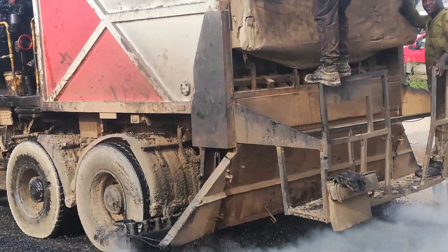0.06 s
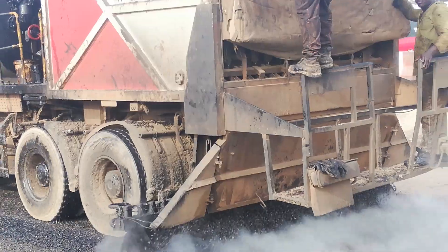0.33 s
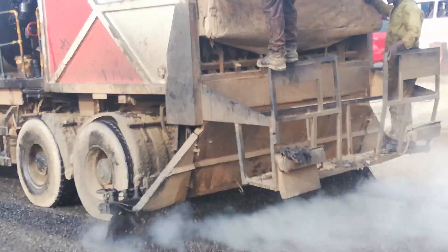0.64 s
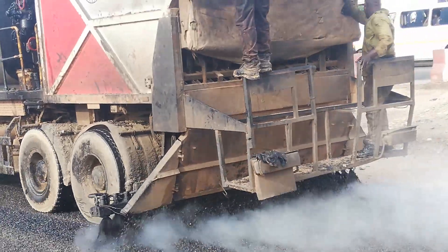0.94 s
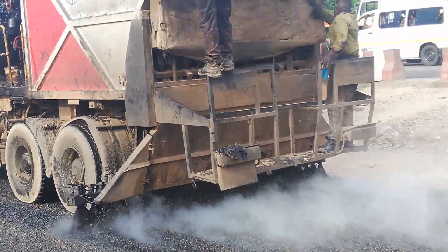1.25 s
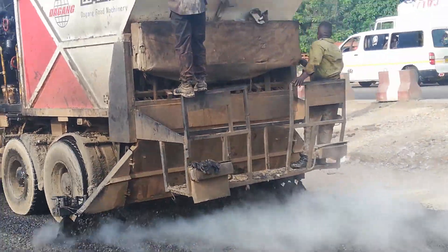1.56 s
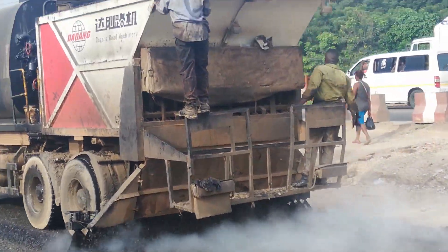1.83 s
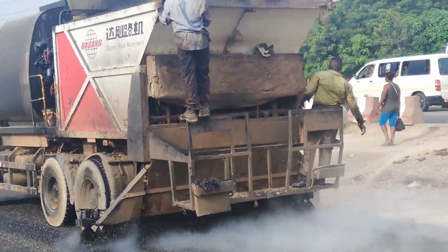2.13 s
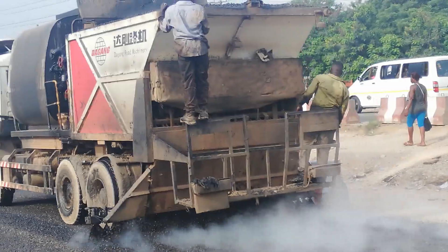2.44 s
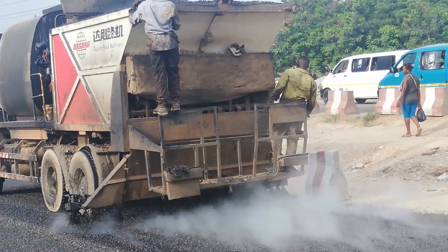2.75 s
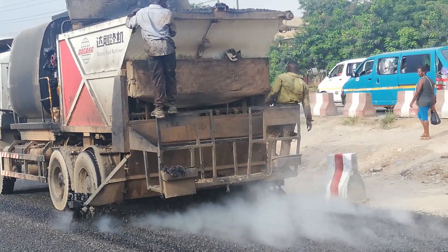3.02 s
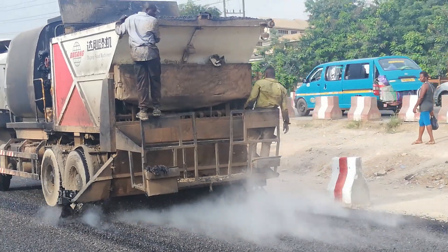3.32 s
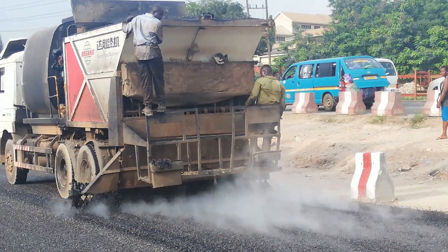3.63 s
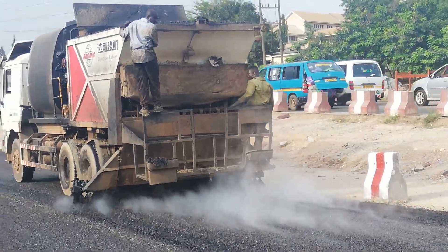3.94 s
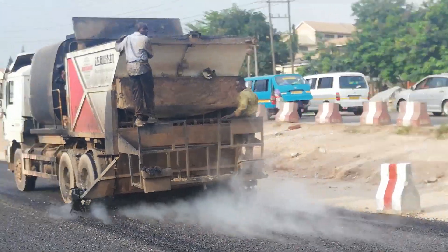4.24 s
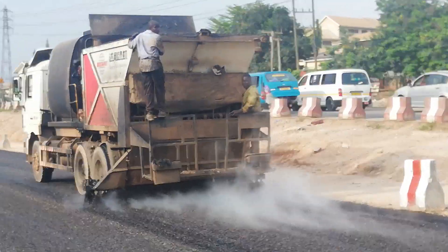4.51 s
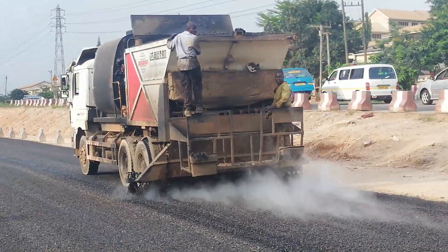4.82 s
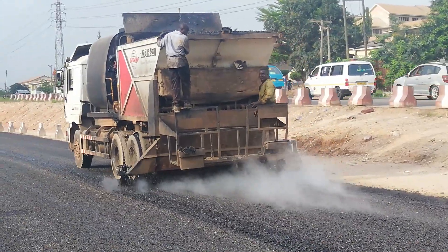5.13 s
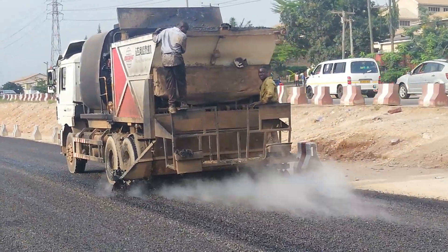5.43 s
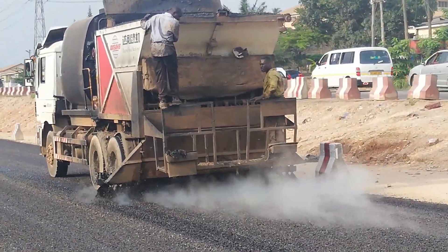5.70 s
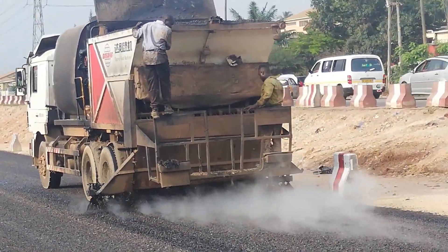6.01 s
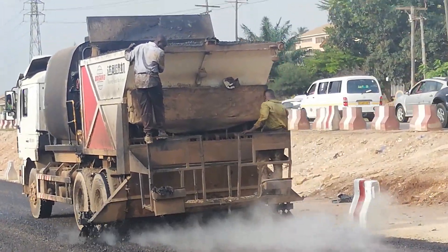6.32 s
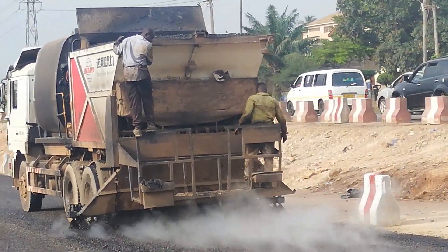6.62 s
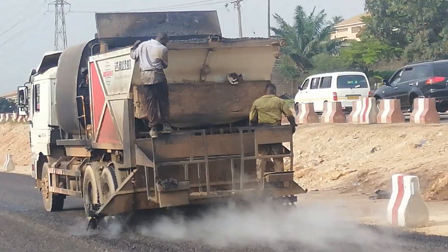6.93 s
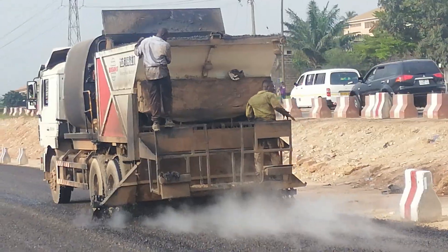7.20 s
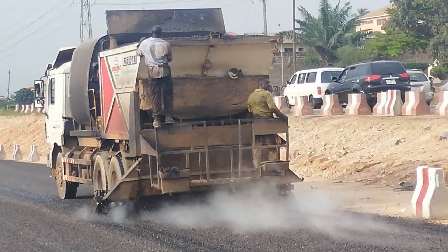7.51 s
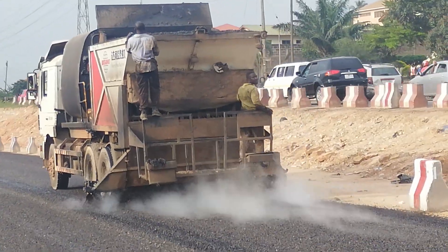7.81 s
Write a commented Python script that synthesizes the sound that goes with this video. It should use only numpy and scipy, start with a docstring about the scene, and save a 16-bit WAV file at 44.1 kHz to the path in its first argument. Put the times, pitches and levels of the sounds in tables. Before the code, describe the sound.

Gravel hisses continuously from a slow spreader truck as its diesel gathers speed, with light metal knocks and distant cars passing.

```python
"""Chip spreader on a fresh road

A truck crawls away, spraying bitumen and pouring chippings: random impacts sum to a hiss, and the spray
roars and rings its pipework. The diesel's harmonics rise with crank speed over a steady pump engine;
steel scrapes, squeaks and knocks, and cars pass beyond. A two-port microphone swings to follow the
truck, so its right port moves in and out of acoustic shadow."""
import sys
import numpy as np
from scipy import signal
from scipy.fft import rfft, irfft
from scipy.io import wavfile

SR = 44100
rng = np.random.default_rng(int(sys.argv[2]) if len(sys.argv) > 2 else 0)


def transcribe(u):
    """Save the signal u as a 16-bit wav file named by the first command-line argument.

    u: samples, shape (n,) or (channels, n), limited to [-1, 1]; the rate is SR.
    q: integer samples, one column per channel.
    """
    v = np.clip(np.atleast_2d(u).T, -1, 1)
    q = np.round(v * 32767).astype(np.int16)
    wavfile.write(sys.argv[1], SR, q)


N = 346626
TIME = np.arange(N) / SR
BINS = np.fft.rfftfreq(N, 1 / SR)

# Levels in spectra, modes and harmonics are relative; each source sets its own overall level.
# likeness of the two ports for far sound: f/Hz, coherence (0-1), right lag/rad
FAR_COHERENCE = [(30, 0.94, 0), (150, 1, 0), (280, 0.96, 0.5), (432, 0, 3.5), (660, 0.43, -2),
                 (940, 0.75, -1.66), (1170, 0.53, 0.5), (2040, 0.38, 1.46), (3040, 0.62, -0.3),
                 (4200, 0.13, 2.4)]
# spectrum of the chippings at the left port, which always faces them: f/Hz, level/dB
STONES_LEFT = [(1500, -19.5), (3600, -12.5), (4450, -14), (5100, -7.5), (6300, -5), (7400, -3.5),
               (8300, -2.5), (9200, 0), (9800, 1), (10500, 1.5), (11100, -4.5), (12000, -13.5),
               (13600, -17), (15600, -27)]
# the same at the right port, open, edge-on and shaded: f/Hz, level/dB, coherence (0-1), lag/rad
RIGHT_OPEN = [(1500, -47, 0.48, 8), (3520, -25, 0.1, 4), (4320, 2.5, 0.2, 0), (5230, -7.5, 0.5, 1.7),
              (6000, 7.5, 0.36, 4), (7150, -5, 0.75, -2), (7750, 6.5, 0.83, 4), (9850, -3, 0, 0),
              (11300, 6, 0.3, -5), (12100, -0.5, 0.33, 5.5), (13400, -8, 0.03, 2.6),
              (14400, -4, 0.09, -2.7), (15600, -17, 0.1, -0.0)]
RIGHT_EDGE_ON = [(1500, -19, 0.16, -11), (4270, -10, 0.05, 6), (4930, 0, 0.89, 1), (5840, -1, 0.83, 0.5),
                 (6500, 1, 0.42, -0.2), (7600, -4, 0.72, -1.8), (8140, -4, 0.12, 5), (8470, 2.5, 0.92, -6),
                 (9400, -1.5, 0.53, 1.1), (10300, 0.5, 0.26, 1.5), (12200, -5, 0.16, 4),
                 (13800, -6.5, 0.21, -0.1), (15600, -19, 0.1, -0.0)]
RIGHT_SHADED = [(1500, -25, 0.09, 2), (3600, -4.5, 0.51, 0), (4170, 0, 0.43, 0), (5000, -5.5, 0.36, 1.7),
                (6100, 1, 0.45, 4), (7200, -10, 0.22, 2), (8100, 1, 0.15, -2), (8600, -11, 0.29, -1.0),
                (9400, -5, 0.29, 5), (11600, -2, 0.33, -0.8), (13000, -8, 0.15, 2), (14000, -9, 0.08, 0.1),
                (15600, -18, 0.1, -0.0)]
# swing of the right port: t/s, bearing (0 open, 1 edge-on, 2 or more shaded), shadow gain/dB
PORT_SWING = [(0, 1.4, -9), (.33, 2.7, -13.5), (.6, 0.46, -5), (1.5, .09, -6), (3.2, .02, -7),
              (4.2, .42, -13), (4.8, 0.89, -9), (6.2, 1.07, -9), (6.8, 1.7, -12), (7.86, 2.3, -11)]
# surges and dips in the flow of stones: middle t/s, duration/s, change/dB
FLOW_SURGES = [(.42, 0.34, -1.3), (.78, 0.64, 1.0), (3.25, .26, -1.5), (5.23, 0.3, 0.8), (6.14, .2, -0.2)]
# roar of the spray bar and pumps: f/Hz, left level/dB, right level/dB
SPRAY_SPECTRUM = [(250, -13, -27), (470, -8.5, -13), (900, -7, -12), (1570, -11, -10), (2550, -4.5, -16.5),
                  (3100, -2.5, -12.5), (4020, -10, -6), (4680, -19, -21), (7000, -32, -37)]
# resonances of the pipework and the steel gate: f/Hz, width/Hz, left level/dB, right level/dB
PIPE_MODES = [(632, 70, -2.5, -6), (752, 100, -2, -7.5), (1104, 200, -4, -6.5), (1302, 170, -6, -2.5),
              (1953, 310, -4, -4.5), (2445, 130, -1, -22), (2610, 210, 2, -13)]
GATE_MODES = [(2510, 120, -9, -14), (2790, 190, -3, 1), (3190, 150, -9, -1), (3440, 200, -13, -4)]
# strokes of gravel through the gate: start t/s, duration/s, level/dB
GATE_STROKES = [(-.03, 0.093, -28), (.14, 0.062, -27)]
# squeaks of rollers and bearings: start t/s, end t/s, f/Hz, width/Hz, left level/dB
ROLLER_SQUEAKS = [(-.1, 0.25, 2090, 70, -38), (-.1, 0.23, 3160, 110, -35.5), (.1, 2.1, 3945, 45, -42.5),
                  (6.6, 7.6, 1602, 200, -46)]
# the diesel gathering speed: t/s, firing rate/Hz, exhaust level/dB
DIESEL_RUN = [(0, 66.4, -50), (.8, 67.5, -49), (1.5, 71.8, -39), (2.95, 80.9, -33.5), (3.45, 82.25, -36.5),
              (5.05, 83.56, -32), (5.8, 84.6, -27.5), (7.0, 86.4, -24.5), (7.86, 85.55, -25)]
# exhaust harmonics: order (multiple of crank speed), level/dB
ENGINE_ORDERS = [(1.5, -32), (2, -20), (2.5, -28), (3, 0.5), (3.5, -15), (4, -25), (4.5, -22), (5.5, -20),
                 (6, -16), (6.5, -22), (7, -17.5), (8, -23.5), (9, -23), (10.5, -22.5), (12, -26)]
# exhaust boom an octave above the firing rate: middle t/s, duration/s, change/dB
EXHAUST_BOOMS = [(7.48, 0.57, 9)]
# partials of the pump engine and its drive: f/Hz, level/dB
PUMP_PARTIALS = [(97, -0.5), (162, -9.5), (194.5, -12.5), (227, -10.5), (259, -9), (275, -10.5),
                 (324, -13.5)]
# spectra of the shaking chassis and the rolling wheels: f/Hz, level/dB
CHASSIS_SPECTRUM = [(20, -25), (45, -4), (65, -3), (100, -3.5), (125, -0.5), (160, -1), (210, -3),
                    (280, -7.5), (340, -10.5), (420, -19), (700, -38)]
WHEEL_SPECTRUM = [(8, -18), (28, -15), (48, 0), (68, 2), (110, -13)]
# lulls and jolts of the chassis: middle t/s, duration/s, change/dB
CHASSIS_JOLTS = [(.3, 1, -3.5), (.85, 0.8, 3), (6.65, .5, 2), (7.6, .7, 1.5)]
# tyre noise from the other carriageway: f/Hz, left level/dB, right level/dB
TYRE_SPECTRUM = [(248, 3, -29), (450, -1, -7), (730, 0.5, -6.5), (1060, 3, -4), (1500, -1.5, -7.5),
                 (2280, -6.5, -11), (3150, -3.5, -5), (3950, -44, -23), (7000, -34, -35)]
# passing cars: nearest t/s, time to half power/s, level/dB
CAR_PASSES = [(3.4, 1.0, -44.5), (5.1, 0.73, -32), (6.72, 0.33, -31), (7.85, 0.42, -32.5)]
# blows of the chute and stray stones: t/s, left level/dB, f/Hz, T60/s, relative rattle level/dB
CHUTE_KNOCKS = [(.419, -26.5, 590, 0.14, 0), (1.196, -31, 1500, .08, 9), (2.733, -26, 3020, .1, 2),
                (6.255, -31, 730, .12, 2)]
# passing engines, the deepest a van: start t/s, end t/s, first f/Hz, last f/Hz, level/dB
ENGINE_GLIDES = [(2.1, 3.6, 142, 159.7, -38), (3.0, 4.4, 29, 53.2, -35.5), (3.3, 3.85, 156, 134.7, -35)]


def amp(db):
    """Amplitude ratio for a level in decibels."""
    return 10 ** (np.asarray(db) / 20)


def unit_rms(x):
    """Normalisation to unit mean power."""
    return x / np.sqrt(np.mean(x ** 2) + 1e-20)


def curve(rows):
    """Linear interpolation of each column of a time table."""
    times, *columns = np.transpose(rows)
    return np.array([np.interp(TIME, times, column) for column in columns])


def swell(middle, length):
    """A raised-cosine window, from zero to one and back."""
    return np.cos(np.pi * np.clip((TIME - middle) / length, -.5, .5)) ** 2


def swells_db(rows):
    """Brief swells and dips, which add in decibels."""
    return sum(db * swell(middle, length) for middle, length, db in rows)


def fade_db(hold_s, db_per_s):
    """A hold, then exponential decay: a straight line in decibels."""
    return -db_per_s * np.maximum(TIME - hold_s, 0)


def drift(rate_hz):
    """Random wandering: low-pass Gaussian noise of unit rms."""
    white = rfft(rng.standard_normal(N))
    return unit_rms(irfft(white * np.exp(-(BINS / rate_hz) ** 2) * (BINS > 0), N))


def tone(hz):
    """A sinusoid of unit rms whose phase is the integral of its frequency."""
    return np.sqrt(2) * np.sin(2 * np.pi * (np.cumsum(hz) / SR + rng.random()))


def coloured(x, rows):
    """Spectral shaping by a level table, with steep roll-off beyond its ends; unit rms."""
    hz, *columns = np.transpose(rows)
    gain_db = np.array([np.interp(np.log(BINS + 1), np.log(hz + 1), column) for column in columns])
    passband = 1 / (1 + (hz[0] / (BINS + 1)) ** 6) / (1 + (BINS / hz[-1]) ** 24)
    return unit_rms(irfft(rfft(x) * amp(gain_db) * np.sqrt(passband), N))


def resonant(x, modes):
    """Modal superposition: x drives Lorentzian peaks, weighted for each port; unit rms."""
    response = sum(amp([[left], [right]]) / (1 + (2 * (BINS - hz) / width) ** 2)
                   for hz, width, left, right in modes)
    return unit_rms(irfft(rfft(x) * response, N))


def ring(x, hz, width_hz):
    """A single resonance, equal at both ports; unit rms."""
    return resonant(x, [(hz, width_hz, 0, 0)])


def ports(pair, coherence_rows):
    """Partial coherence: the right port mixes a phase-shifted left with an independent signal."""
    left, independent = rfft(pair)
    hz, coherence, lag = np.transpose(coherence_rows)
    shared = np.interp(BINS, hz, np.clip(coherence, 0, .999) * np.exp(-1j * lag))
    right = shared * left + np.sqrt(1 - abs(shared) ** 2) * independent
    return irfft(np.array([left, right]), N)


def noise():
    """White noise with the coherence of far sound at the two ports."""
    return ports(rng.standard_normal((2, N)), FAR_COHERENCE)


def shadowed(pour):
    """Acoustic shadow: the microphone's body notches and weakens the right port as it swings."""
    bearing, shadow_db = curve(PORT_SWING)
    bearing = np.clip(bearing, 0, 2)
    right = 0
    for k, view in enumerate(map(np.array, (RIGHT_OPEN, RIGHT_EDGE_ON, RIGHT_SHADED))):
        heard = ports(pour, view[:, [0, 2, 3]])[1]
        crossfade = np.maximum(1 - abs(bearing - k), 0)
        right = right + crossfade * coloured(heard, view[:, :2])
    return right * amp(shadow_db)


def reflected(x, echo_db=-20.0, count=8):
    """Interference: faint early echoes from the road and the truck's panels ripple the spectrum."""
    delays_s = rng.uniform(.001, .007, count)
    signs = rng.choice([-1, 1], count)
    echoes = sum(sign * np.roll(x, round(s * SR), axis=-1) for s, sign in zip(delays_s, signs))
    return (x + amp(echo_db) * echoes / np.sqrt(count)) / np.hypot(1, amp(echo_db))


def chippings(level_db=-14.5, stones_per_s=9000, size_spread_db=4.0, grit_db=2.0, roller_hz=2.9):
    """Shot noise: random stone impacts over a wash of grit, surging with each turn of the feed roller."""
    sizes = amp(size_spread_db * np.minimum(rng.exponential(1, (2, N)), 4))
    hits = rng.choice([-1, 1], (2, N)) * (rng.random((2, N)) < stones_per_s / SR)
    pour = unit_rms(sizes * hits) + amp(grit_db) * rng.standard_normal((2, N))
    hiss = np.vstack([coloured(pour[0], STONES_LEFT), shadowed(pour)])
    roller_db = 0.28 * np.sin(2 * np.pi * roller_hz * TIME)
    clumps_db = 0.49 * drift(25)
    receding_db = fade_db(hold_s=1.82, db_per_s=0.59)
    return hiss * amp(level_db + receding_db + swells_db(FLOW_SURGES) + roller_db + clumps_db)


def spray(level_db=-26, roar_db=-1.5, pipes_db=-4.0):
    """Forced resonance: the roar of nozzles and pumps rings the pipework, fading as the truck recedes."""
    roar = amp(roar_db) * coloured(noise(), SPRAY_SPECTRUM)
    pipes = amp(pipes_db) * resonant(noise(), PIPE_MODES)
    return (roar + pipes) * amp(level_db + fade_db(hold_s=0, db_per_s=1.82))


def gate_scrape(attack_s=0.046, release_db_per_s=85, judder_db=2.0):
    """Sliding friction: short strokes of gravel excite the modes of the steel gate."""
    force = 0
    for start, length, db in GATE_STROKES:
        attack = np.clip((TIME - start) / attack_s, 0, 1)
        force = force + attack * amp(db + fade_db(start + length, release_db_per_s))
    return resonant(noise(), GATE_MODES) * force * amp(judder_db * drift(60))


def squeaks(right_db=7.0):
    """Dry friction drives narrow resonances in rollers and bearings."""
    rub, out = noise(), 0
    for start, end, hz, width, db in ROLLER_SQUEAKS:
        envelope = np.sin(np.pi * np.clip((TIME - start) / (end - start), 0, 1))
        out = out + amp(db) * envelope * ring(rub, hz, width)
    return out * amp([[0], [right_db]])


def diesel(firings_per_turn=3, wobble_hz=0.23, firing_waver_db=1.0, other_waver_db=0.5):
    """Engine orders: periodic firing puts the exhaust's lines at multiples of half the crank speed."""
    firing_hz, level_db = curve(DIESEL_RUN)
    turns = np.cumsum(firing_hz + wobble_hz * drift(5)) / SR / firings_per_turn
    exhaust = np.zeros(N)
    for order, db in ENGINE_ORDERS:
        waver_db = firing_waver_db if order == firings_per_turn else other_waver_db
        boom_db = swells_db(EXHAUST_BOOMS) if order == 2 * firings_per_turn else 0
        gain = amp(db + boom_db + waver_db * drift(6.5))
        exhaust += gain * np.sin(2 * np.pi * (order * turns + rng.random()))
    return np.sqrt(2) * exhaust * amp(level_db)


def pump(near_db=-33.5, far_db=-45.5, wobble=0.00816, waver_db=2.0):
    """A governed engine has a steady line spectrum; it sinks to a far hum as the truck leaves."""
    speed = 1 + wobble * drift(6.1)
    hum = sum(amp(db + waver_db * drift(6.6)) * tone(hz * speed) for hz, db in PUMP_PARTIALS)
    near = amp(near_db + fade_db(hold_s=1.16, db_per_s=6))
    return hum * np.hypot(near, amp(far_db))


def feed_drive(level_db=-42.5, pitch_hz=367, wobble=0.0103, waver_db=3.0, octave_db=-5.5, stop_s=0.98):
    """Random modulation makes the drive's whine unsteady; it dulls as its octave decays, then stops."""
    hz = pitch_hz * (1 + wobble * drift(8))
    octave_gain = amp(octave_db + fade_db(hold_s=0.64, db_per_s=60))
    whine = tone(hz) + octave_gain * tone(2 * hz)
    return whine * amp(level_db + fade_db(stop_s, db_per_s=120) + waver_db * drift(21))


def chassis(level_db=-30.5, right_db=-1.45):
    """Structural vibration: the heavy chassis radiates low noise, easing and jolting as it rolls."""
    shake = coloured(noise(), CHASSIS_SPECTRUM)
    return shake * amp(level_db + swells_db(CHASSIS_JOLTS)) * amp([[0], [right_db]])


def wheels(cruise_db=-34.5, cruise_firing_hz=84.5, db_per_hz=.5, uneven_db=0.5):
    """Rolling noise grows with speed, so the deep rumble follows the diesel's firing rate."""
    firing_hz = curve(DIESEL_RUN)[0]
    level_db = cruise_db + db_per_hz * (firing_hz - cruise_firing_hz) - uneven_db * drift(2.0)
    return coloured(noise(), WHEEL_SPECTRUM) * amp(level_db)


def passing_tyres(far_db=-45):
    """Inverse-square law: each car's tyre noise peaks when nearest, adding in power to far traffic."""
    power = amp(far_db) ** 2
    for nearest_s, half_power_s, db in CAR_PASSES:
        power = power + amp(db) ** 2 / (1 + ((TIME - nearest_s) / half_power_s) ** 2)
    return coloured(noise(), TYRE_SPECTRUM) * np.sqrt(power)


def knocks(rattle_t60_s=0.11, right_db=-6.0):
    """Damped free vibration: each blow rings one steel mode and shakes a short rattle around it."""
    shake, out = noise(), 0
    for start, db, hz, t60, rattle_db in CHUTE_KNOCKS:
        age = np.maximum(TIME - start, 0)
        mode = np.sin(2 * np.pi * hz * age) * amp(-60 * age / t60)
        rattle = ring(shake, hz, width_hz=hz) * amp(rattle_db - 60 * age / rattle_t60_s)
        out = out + amp(db) * (TIME > start) * (mode + rattle)
    return out * amp([[0], [right_db]])


def passing_engines(unsteady=0.83):
    """Traffic engines moan as low gliding tones under random amplitude modulation."""
    out = 0
    for start, end, first_hz, last_hz, db in ENGINE_GLIDES:
        envelope = amp(db) * np.sqrt(swell((start + end) / 2, end - start))
        flutter = (1 + unsteady * drift(13)) / np.hypot(1, unsteady)
        hz = np.interp(TIME, [start, end], [first_hz, last_hz])
        out = out + envelope * flutter * tone(hz)
    return out


def scene():
    """Superposition in the open air; the engine and drive tones reach both ports alike."""
    spreader = reflected(chippings() + spray() + gate_scrape())
    truck = spreader + squeaks() + knocks() + diesel() + pump() + feed_drive() + chassis() + wheels()
    return truck + passing_tyres() + passing_engines()


def record(dry, ceiling=.92, cutoff_hz=15750):
    """Soft saturation rounds the sharpest stone clicks; a low-pass filter then limits the band."""
    rounded = dry / (1 + (dry / ceiling) ** 8) ** (1 / 8)
    lowpass = signal.firwin(511, cutoff_hz, window=("kaiser", 9), fs=SR)
    return signal.oaconvolve(rounded, lowpass[None], "same")


dry = scene()
out = record(dry)
transcribe(out)
```